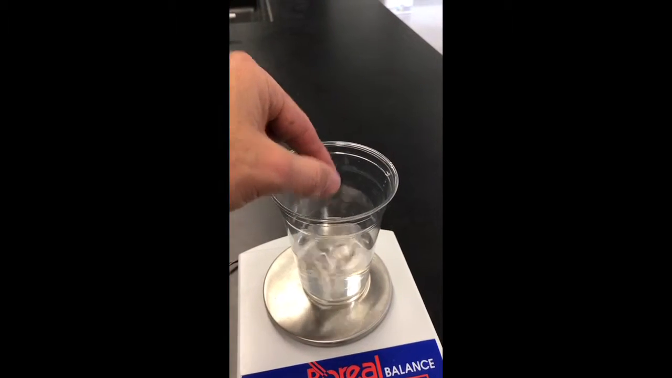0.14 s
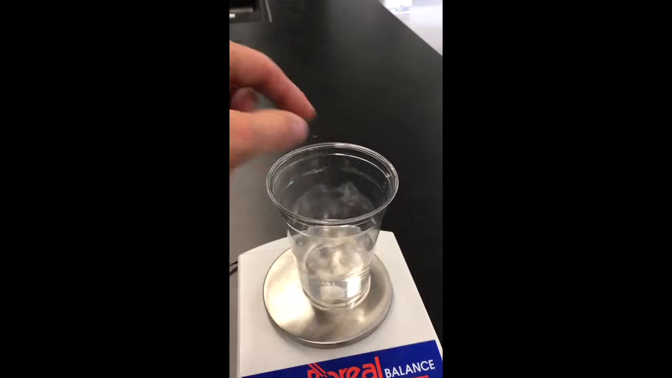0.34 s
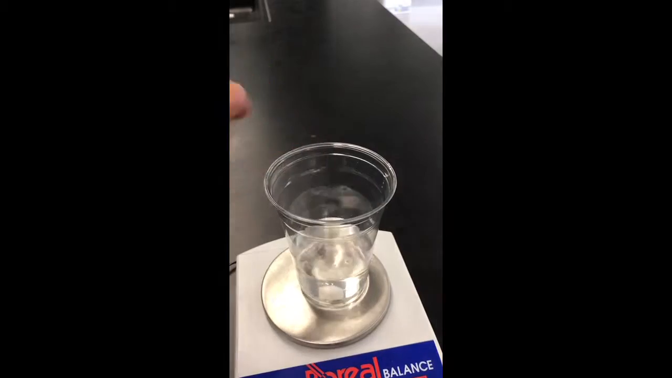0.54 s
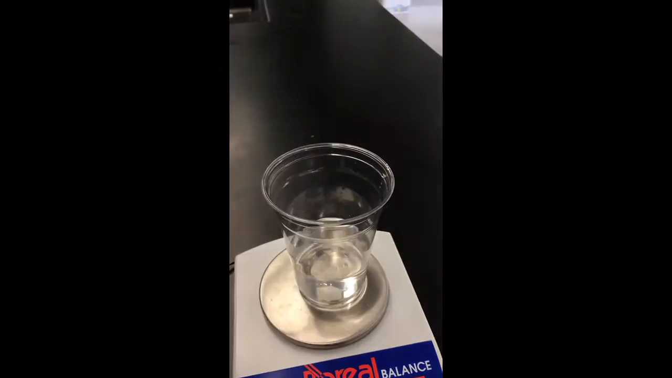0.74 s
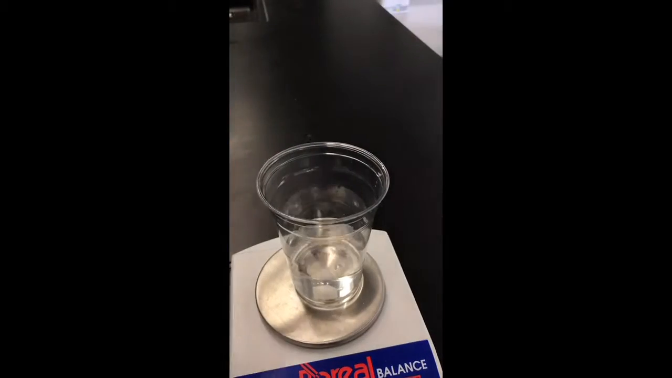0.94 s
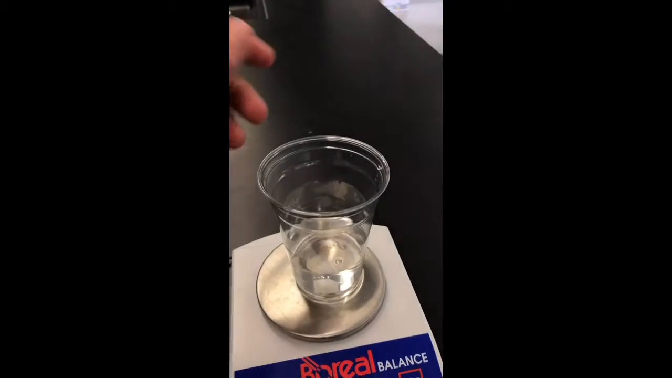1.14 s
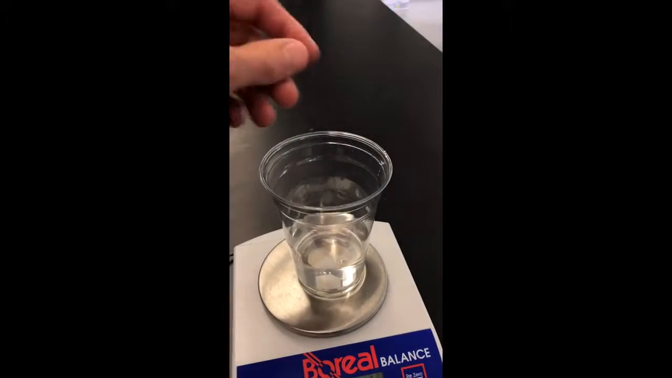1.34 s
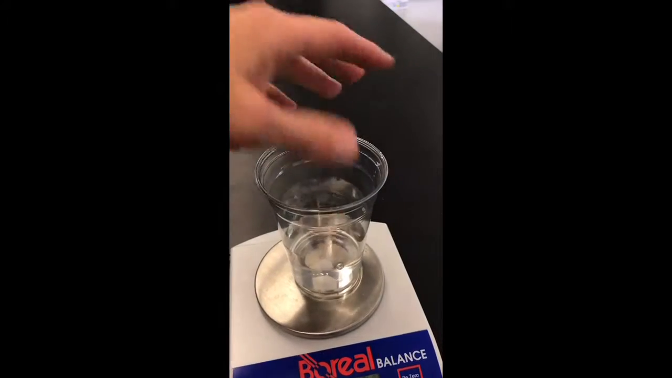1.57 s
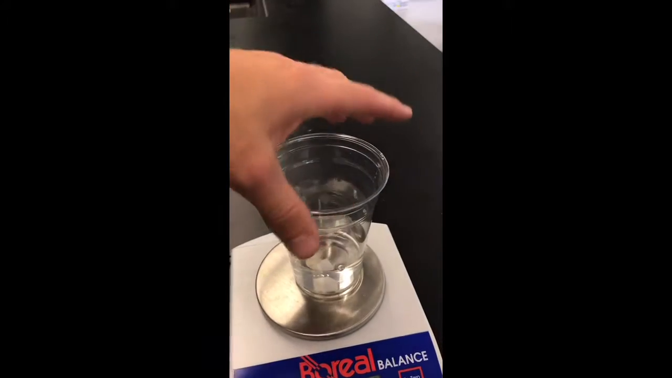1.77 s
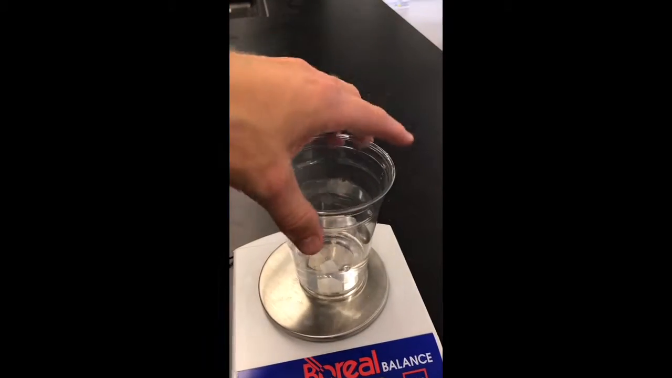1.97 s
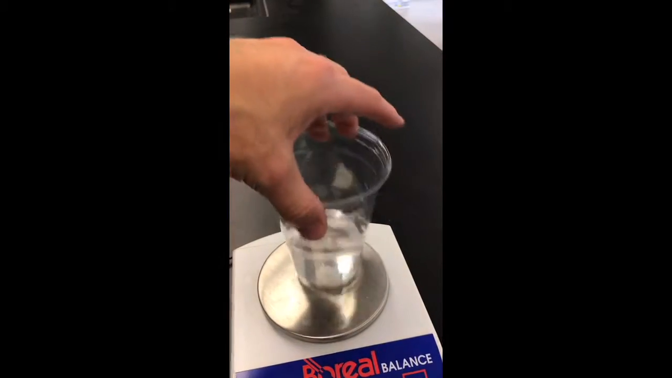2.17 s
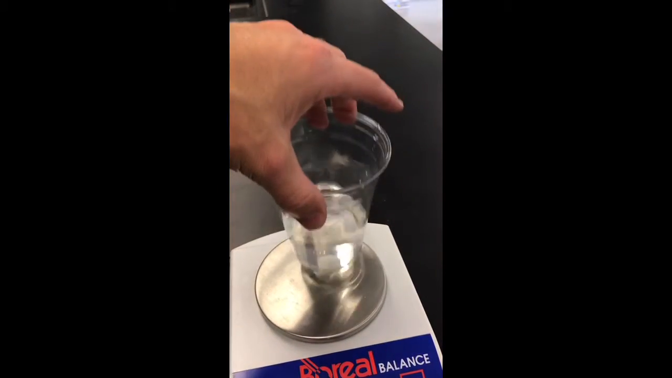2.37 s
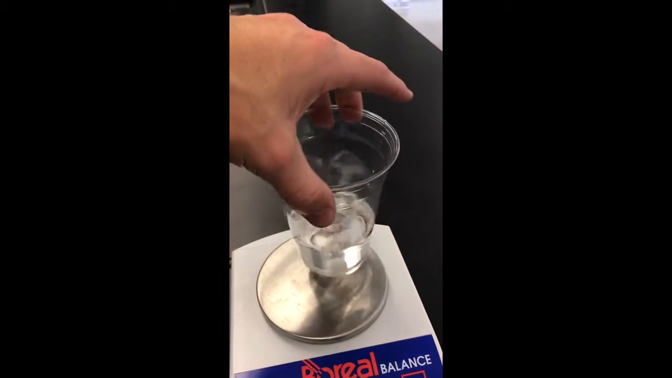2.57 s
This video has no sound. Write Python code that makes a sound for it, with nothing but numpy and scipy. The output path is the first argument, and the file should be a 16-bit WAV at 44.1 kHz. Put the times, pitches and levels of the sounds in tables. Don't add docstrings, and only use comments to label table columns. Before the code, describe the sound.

A sugar cube clatters into a thin plastic cup of water with a sharp crack and short gulp, settles with a faint tap, then fingers squeak softly on the cup; close microphone, quiet humming room.

```python
import sys
import numpy as np
from scipy import signal
from scipy.fft import rfft, irfft, next_fast_len
from scipy.io import wavfile
from scipy.ndimage import map_coordinates

SR = 44100
rng = np.random.default_rng(int(sys.argv[2]) if len(sys.argv) > 2 else 0)


def wav_record(signal):
    frames = np.transpose(np.atleast_2d(signal))
    bounded = np.clip(frames, -1, 1)
    quanta = np.round(bounded * 32767).astype(np.int16)
    wavfile.write(sys.argv[1], SR, quanta)


def boost_factor(decibels):
    exponent = np.asarray(decibels, float) / 20
    return 10 ** exponent


N = 114660

# f/Hz, level/dB per Hz
RUMBLE = [(12, -33), (35, -9.5), (60, -2), (110, 1), (145, -8), (198, 0), (240, -10), (330, -21.5),
          (600, -120)]
AIR = [(150, -55), (300, 2.5), (650, -0.5), (1000, -2), (2000, -9), (4000, -13), (6500, -19.5), (9500, -46),
       (16000, -120)]
HISS = [(3000, -10), (6500, 0), (9800, -1), (10500, -5.5), (11200, -1.5), (13000, -1), (14500, -3),
        (15700, -3)]
RUMBLE_DB, AIR_DB, HISS_DB = -55.5, -61.5, -68.5

# multiple of shaft speed, level/dB rms
MOTOR = [(1, -61), (4, -60.5), (5, -61), (6, -75), (7, -80)]
MOTOR_HZ, MOTOR_SWAY_DB = 58.3, 1
MAINS_HZ, MAINS_DB, MAINS_SWAY_DB = 120.8, -59, 1.5
# t/s, level/dB
WHINE_SWELL = [(0, -83), (.2, -80), (.42, -85), (.6, -88), (.72, -86), (.85, -100), (1.2, -92), (1.38, -80),
               (1.47, -87), (1.62, -86), (1.75, -93), (2.3, -102), (2.45, -85), (2.6, -85)]
WHINE_HZ, WHINE_DB = 15228, -83

# t/s, ring level/dB, f/Hz, t60/s, snap level/dB
TICKS = [(0.1714, -50, 8800, 0.0042, -62), (.1725, -52, 13200, .004, -80), (.172, -52, 7500, .004, -80),
         (.172, -56, 10800, .004, -80), (.1725, -56, 15200, .003, -80), (1.111, -56, 13000, .003, -80),
         (1.111, -55, 9700, .004, -80), (2.104, -51, 1680, 0.038, -80), (.2348, -17.5, 8660, 0.0024, -30.5),
         (.466, -70, 12000, .003, -54), (.668, -50, 7000, 0.004, -75), (0.726, -54, 6200, .008, -75),
         (1.112, -47, 11200, 0.0045, -69), (1.555, -60, 13000, .003, -63), (2.074, -53, 4200, .006, -56),
         (2.102, -56, 5600, 0.011, -62), (2.2875, -46.5, 5320, 0.0062, -50),
         (2.2875, -51, 3600, 0.0048, -62), (2.2885, -45.5, 860, 0.025, -80),
         (2.4037, -52.5, 2650, 0.0086, -56), (2.427, -54, 2500, .008, -66),
         (2.4845, -50, 4000, 0.0097, -59), (2.4865, -45.5, 2700, 0.0066, -55),
         (2.4845, -49, 890, 0.025, -80)]
# f/Hz, level/dB
SNAP = [(800, -3.5), (2500, -3.5), (6000, -6), (9000, -26), (14000, -9), (16000, -11)]
SNAP_T60_S = 0.0064
# middle t/s, half length/s, squeak level/dB, scrape level/dB
SLIPS = [
    (2.005, 0.0076, -59, -70),
    (2.015, 0.0057, -53, -56),
    (2.023, 0.004, -51, -62),
    (2.031, 0.0048, -60, -69),
    (2.085, 0.0059, -63, -64),
    (2.096, 0.0043, -61, -68),
    (2.103, 0.0034, -60, -56.5),
    (2.113, 0.0055, -58.5, -61),
    (2.119, 0.0033, -65, -77),
    (1.461, 0.021, -94, -90),
]
# f/Hz, width/Hz, level/dB
SQUEAK = [(2740, 690, 1.5), (1680, 120, -2.5), (4270, 210, -7), (5950, 400, -6.5)]
# f/Hz, level/dB
SCRAPE = [(500, -34), (1200, 1.5), (2500, -8), (5000, -7.5), (8000, -8.5), (12000, -14), (16000, -19)]
SLIPS_PER_S, SLIP_SCATTER_DB = 5000, 2
REGRIP_S, REGRIP_RISE = 2.06, 1
# f/Hz, level/dB
SLEEVE = [(2500, -40), (5000, -4), (8000, 0), (12000, -3), (16000, -4)]
SLEEVE_S, SLEEVE_HALF_S, SLEEVE_DB = 1.462, 0.022, -67
# middle t/s, half length/s, level/dB, f/Hz, glide/Hz per s
SINGS = [(2.004, .0035, -52.5, 2650, -20000), (2.012, .004, -51.5, 2610, 10000),
         (2.024, 0.0017, -52, 2620, -20000), (2.085, .005, -57, 2730, 30000),
         (2.093, .004, -59, 2700, -20000), (2.103, 0.0022, -53, 2800, 40000),
         (2.113, .005, -50, 2800, -10000), (2.123, 0.0026, -62, 2750, 5000)]

KNOCK_S = [.2292, .2296, .2318, .2355, .2388, .2422, .2478]
# low modes/dB, middle modes/dB, high modes/dB, crack/dB
KNOCKS = [
    (-17, -42, -37, -32),
    (-45, -32, -26.5, -20),
    (-40, -36, -27, -24.5),
    (-35, -27.5, -42, -27.5),
    (-49, -31, -25, -28),
    (-43, -23, -27, -24),
    (-49, -30, -34, -52),
]
# f/Hz, level/dB, t60/s
CUP_LOW = [(860, -3, 0.079), (1038, -5, 0.044), (1130, -24, 0.069)]
CUP_MID = [(1215, -4, 0.03), (1388, -10, 0.051), (1560, -9, 0.033), (1730, 1.5, 0.031), (1890, -8, 0.031),
           (2080, -6.5, 0.067)]
CUP_HIGH = [(2380, -11, 0.034), (2687, -3.5, 0.033), (2970, -6, 0.025), (3373, -5, 0.019),
            (4040, -15, 0.026), (4640, -23, .018), (4970, -18, 0.011), (5600, -8, 0.014),
            (6100, -21, 0.011), (7380, -15, 0.019)]
STRIKE_S, SCATTER_DB = 0.00019, 2.5
# f/Hz, level/dB
CRACK = [(900, -37), (2300, -5), (4000, 9), (6000, 4.5), (9000, -9), (12000, -8.5), (16000, -35)]
CRACK_T60_S = 0.011
SINK_S, SINK_DB, SINK_TAKES_S = 0.238, -10.5, 0.0039
# t/s, level/dB, f/Hz, t60/s, swell/s
CAVITY = [
    (.2325, -36, 287, 0.065, .004),
    (.244, -42.5, 299, 0.082, 0.0045),
    (.2312, -26.5, 590, 0.047, 0.0034),
]
# t/s, level/dB, f/Hz, t60/s
CORNERS = [(0.2293, -17, 1885, 0.029), (.2293, -23, 2722, .02), (.2296, -22, 4240, .013),
           (.2297, -21, 5490, 0.019), (.232, -29, 6410, 0.011), (0.2324, -29, 1648, 0.023),
           (0.2333, -23, 3320, 0.017), (0.2381, -27, 1310, 0.021), (0.2388, -22, 2970, 0.016),
           (0.2393, -27, 1810, 0.027)]
# f/Hz, level/dB, t60/s
PAN = [(508, -47.5, 0.29), (642.6, -43, 0.27), (1027, -52, 0.57)]
# t/s, level/dB
SETTLE = [
    (.4096, -46),
    (.4109, -42),
]
# f/Hz, level/dB, t60/s
BOTTOM = [(950, -3, 0.018), (1160, 0, 0.041), (1480, -16, 0.0068), (1866, 3, 0.048), (2040, -10, 0.013),
          (2500, -2, 0.018), (2730, -1, 0.03), (3650, -12, 0.0096)]
# t/s, level/dB, f/Hz, t60/s
BUBBLES = [
    (0.259, -34, 950, 0.036),
    (.275, -43, 564, 0.059),
    (.322, -55, 990, 0.048),
]
BUBBLE_RISE, BUBBLE_ATTACK_S = 2.7, 0.0017

# f/Hz, t60/s
ROOM = [(300, 0.56), (1000, 0.54), (3000, 0.38), (6000, 0.38), (12000, 0.4)]
# f/Hz, level/dB
TOWARDS_WALLS = [(300, -18), (600, -3.5), (1000, -0.5), (2000, -4.5), (3000, -5), (4500, -8), (6500, -13.5),
                 (9000, -22.5), (15000, -32)]
ROOM_DB, SETTLE_ROOM_DB, ROOM_DELAY_S = -1, -24, 0.018
SPREAD_HZ, FINGER_ROOM_DB = 500, -26
TOP_HZ = 15750


def unit(x):
    return x / np.sqrt(np.mean(x ** 2) + 1e-20)


def along(points, hz):
    f, v = np.transpose(points)
    return np.interp(np.log(hz + 1), np.log(f + 1), v)


def wobble(rate):
    knots = rng.standard_normal(int(N / SR * 40) + 4)
    return map_coordinates(knots, [np.arange(N) * min(rate, 40) / SR])


def filtered(x, response):
    m = next_fast_len(len(x) + 8192)
    return irfft(rfft(x, m) * response(np.fft.rfftfreq(m, 1 / SR)), m)[:len(x)]


def noise(spectrum, size):
    return unit(filtered(rng.standard_normal(size), lambda hz: boost_factor(along(spectrum, hz))))


def ring(t, hz, db, t60, attack):
    return boost_factor(db - 60 * t / t60) * (1 - np.exp(-t / attack)) * np.sin(2 * np.pi * hz * t)


def add(out, s, sound):
    part = out[round(s * SR):][:len(sound)]
    part += sound[:len(part)]


def air():
    rumble = boost_factor(RUMBLE_DB + 0.27 * wobble(4.5)) * noise(RUMBLE, N)
    breath = boost_factor(AIR_DB + 0.13 * wobble(4.0) + 0.53 * wobble(14)) * noise(AIR, N)
    hiss = boost_factor(HISS_DB + 0.12 * wobble(4.4)) * noise(HISS, N)
    return rumble + breath + hiss


def hum():
    t = np.arange(N) / SR

    def tone(hz, db, drift):
        phase = 2 * np.pi * hz * t + 6 * rng.random() + drift * wobble(2.58)
        return np.sqrt(2) * boost_factor(db) * np.sin(phase)

    motor = sum(tone(k * MOTOR_HZ, db + MOTOR_SWAY_DB * wobble(3.7), 0.1) for k, db in MOTOR)
    mains = tone(MAINS_HZ, MAINS_DB + MAINS_SWAY_DB * wobble(5.9), 0.52)
    s, whine_db = np.transpose(WHINE_SWELL)
    swell_db = np.interp(t, s, whine_db - whine_db.mean())
    return motor + mains + tone(WHINE_HZ, WHINE_DB + swell_db, 2.5)


def ticks():
    out, t = np.zeros(N), np.arange(SR // 20) / SR
    for s, db, hz, t60, snap_db in TICKS:
        snap = boost_factor(snap_db - 60 * t / SNAP_T60_S) * noise(SNAP, len(t))
        add(out, s, ring(t, hz, db, t60, STRIKE_S) + snap)
    return out


def wall(f):
    return sum((-1) ** k * boost_factor(db) * 1j * f * width / (centre ** 2 - f ** 2 + 1j * f * width)
               for k, (centre, width, db) in enumerate(SQUEAK))


def squeaking():
    luck = rng.random(N)
    pulses = np.clip((SLIPS_PER_S / SR - luck) * 400, 0, 1)
    slips = unit(pulses * boost_factor(SLIP_SCATTER_DB * rng.standard_normal(N)))
    first = unit(filtered(slips, lambda f: wall(f) ** 2))
    second = unit(filtered(slips, lambda f: wall(f / REGRIP_RISE) ** 2))
    return np.where(np.arange(N) / SR < REGRIP_S, first, second)


def fingers():
    out, now = ticks(), np.arange(N) / SR
    squeak, scrape = squeaking(), noise(SCRAPE, N)
    for s, half, squeak_db, scrape_db in SLIPS:
        stroke = np.exp(-((now - s) / half) ** 2)
        out += stroke * (boost_factor(squeak_db) * squeak + boost_factor(scrape_db) * scrape)
    brush = np.exp(-((now - SLEEVE_S) / SLEEVE_HALF_S) ** 2)
    out += boost_factor(SLEEVE_DB) * brush * noise(SLEEVE, N)
    for s, half, db, hz, glide in SINGS:
        u = now - s
        out += boost_factor(db) * np.exp(-(u / half) ** 2) * np.sin(2 * np.pi * (hz + glide * u / 2) * u)
    return out


def knocks():
    out, t = np.zeros(N), np.arange(SR // 2) / SR
    for s, (*modes_db, crack_db) in zip(KNOCK_S, KNOCKS):
        for modes, db in zip((CUP_LOW, CUP_MID, CUP_HIGH), modes_db):
            chance = SCATTER_DB * rng.standard_normal(len(modes))
            for k, (hz, mode_db, t60) in enumerate(modes):
                add(out, s, (-1) ** k * ring(t, hz, db + mode_db + chance[k], t60, STRIKE_S))
        add(out, s, boost_factor(crack_db - 60 * t / CRACK_T60_S) * noise(CRACK, len(t)))
    since = np.arange(N) / SR - SINK_S
    return out * boost_factor(SINK_DB * np.clip(since / SINK_TAKES_S, 0, 1))


def cube():
    out, t = knocks(), np.arange(SR // 2) / SR
    for s, db, hz, t60, swell in CAVITY:
        add(out, s, ring(t, hz, db, t60, swell))
    for s, db, hz, t60 in CORNERS:
        add(out, s, ring(t, hz, db, t60, attack=0.00054))
    for hz, db, t60 in PAN:
        add(out, KNOCK_S[2], ring(t, hz, db, t60, attack=0.0048))
    for s, db in SETTLE:
        for k, (hz, mode_db, t60) in enumerate(BOTTOM):
            add(out, s, (-1) ** k * ring(t, hz, db + mode_db, t60, STRIKE_S))
    for s, db, hz, t60 in BUBBLES:
        add(out, s, ring(t, hz * (1 + BUBBLE_RISE * t), db, t60, BUBBLE_ATTACK_S))
    return out


def room(x):
    hz, t, z = signal.stft(rng.standard_normal(SR // 2), SR, nperseg=256)
    decay = boost_factor(-60 * t / along(ROOM, hz)[:, None])
    tail = signal.istft(z * decay, SR, nperseg=256)[1]
    tail = tail * np.clip(np.arange(len(tail)) / SR / ROOM_DELAY_S, 0, 1) ** 2
    return signal.fftconvolve(x, tail / np.linalg.norm(tail))[:N]


def scene():
    drop, grip, blows = cube(), fingers(), np.zeros(N)
    add(blows, KNOCK_S[1], boost_factor([ROOM_DB]))
    add(blows, SETTLE[1][0], boost_factor([SETTLE_ROOM_DB]))
    splash = filtered(blows, lambda hz: boost_factor(along(TOWARDS_WALLS, hz)))
    flutter = unit(filtered(rng.standard_normal(N), lambda hz: np.exp(-(hz / SPREAD_HZ) ** 2)))
    walls = room(splash + boost_factor(FINGER_ROOM_DB) * grip * flutter)
    return (drop + grip + walls + hum() + air())[None]


def roll_off(x):
    return signal.sosfilt(signal.butter(12, 16060, fs=SR, output="sos"), x)


def record(dry):
    mix = filtered(dry[0], lambda hz: hz < TOP_HZ)[None]
    return roll_off(mix)


dry = scene()
out = record(dry)
wav_record(out)
```